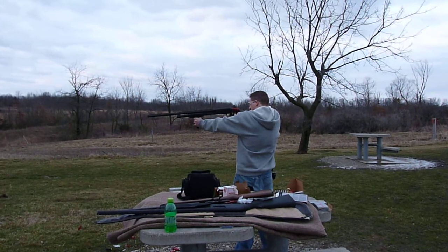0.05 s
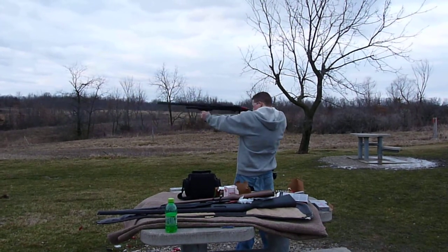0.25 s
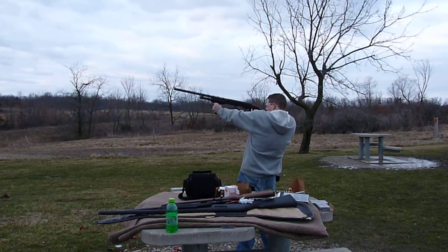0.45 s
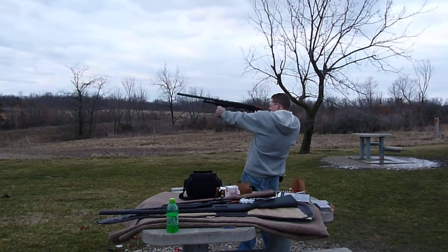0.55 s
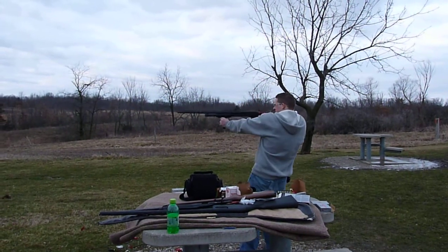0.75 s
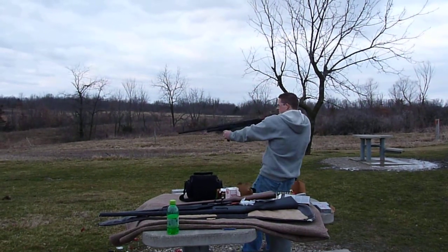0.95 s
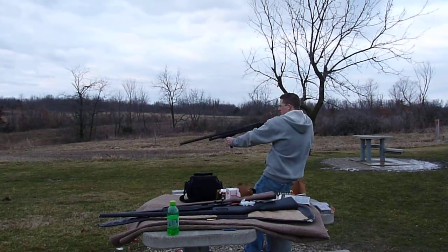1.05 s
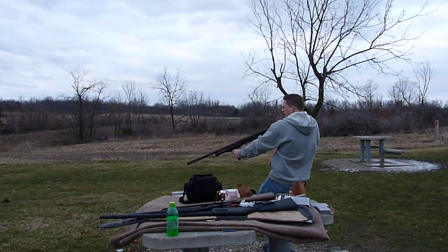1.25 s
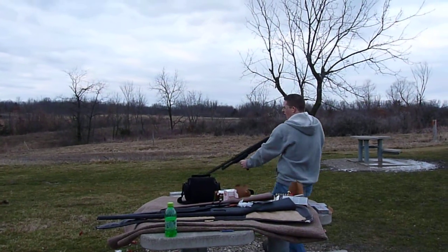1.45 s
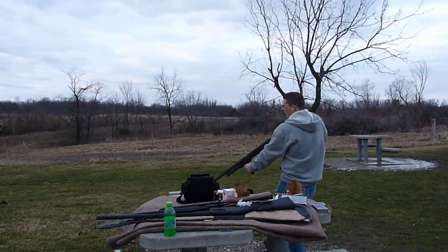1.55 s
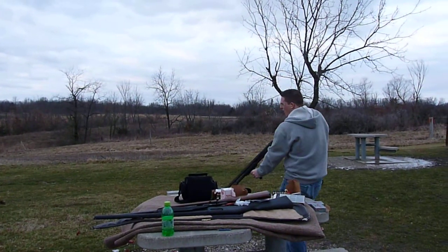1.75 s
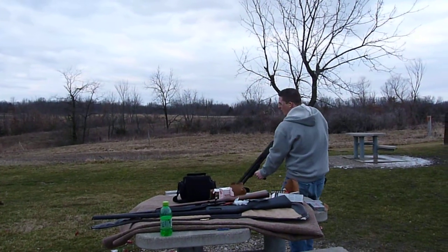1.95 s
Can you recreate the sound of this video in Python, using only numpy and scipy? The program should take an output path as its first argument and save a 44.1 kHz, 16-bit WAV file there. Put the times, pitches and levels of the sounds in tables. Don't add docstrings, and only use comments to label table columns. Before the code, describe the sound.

One loud, overloaded shotgun shot, then crackling, thumping echoes fading over quiet open ground

```python
import sys
import numpy as np
from scipy import signal
from scipy.fft import rfft, irfft
from scipy.io import wavfile
from scipy.ndimage import uniform_filter1d

SR = 44100
rng = np.random.default_rng(int(sys.argv[2]) if len(sys.argv) > 2 else 0)


def digitize_waveform(pressure):
    field = np.atleast_2d(pressure).T
    bounded = np.clip(field, -1, 1)
    quanta = np.round(bounded * 32767).astype(np.int16)
    wavfile.write(sys.argv[1], SR, quanta)


def ratio(d):
    e = np.asarray(d, float) / 20
    return 10 ** e


N = 88200
T = np.arange(N) / SR
SHOT_S = .2172

# start_s, level_db
OVERLOAD_KICKS = [(.2185, -15), (.2204, -18), (.2239, -16), (.2248, -19), (.2256, -17), (.2280, -15),
                  (.2305, -19), (.2316, -21), (.2322, -22), (.2331, -21), (.2355, -19), (.2378, -22),
                  (.2393, -24)]
# time_s, level_db
ROAR_LEVEL = [(.23, -21), (0.263, -24.5), (0.309, -30.5), (.5, -27.5), (0.771, -27.5), (1.099, -28.5),
              (1.2, -32.5), (1.6, -38), (2.0, -45)]
# pitch_hz, level_db
ROAR_TONE = [(70, -20), (230, 0.5), (345, -4), (560, -18), (800, -10), (1370, -13), (2770, -25.5),
             (5000, -62.5)]
# centre_s, depth_db, length_s
LULLS = [(0.406, -2.5, 0.014), (0.593, -3.5, 0.0093), (1.194, -3, 0.0097), (1.235, -1.5, 0.0091),
         (0.243, 0, 0.0077), (0.86, -1, .008), (0.377, -3, 0.0061), (.414, -5.5, 0.0037),
         (.474, -3.5, 0.0049), (0.513, -5, 0.0092), (0.645, -3.5, 0.0057), (.72, -0.5, .01),
         (0.788, -1.5, .006), (1.147, -2.5, .005), (1.596, -2.5, 0.006), (1.895, -3, 0.011)]
# centre_s, level_db, length_s, pitch_hz
THUMPS = [(0.261, -21, 0.0067, 224), (0.28, -18.5, 0.0045, 324), (0.321, -18.5, 0.0065, 267),
          (0.355, -22.5, 0.012, 267), (0.391, -13.5, 0.0067, 290), (0.455, -11.5, 0.0078, 195),
          (0.492, -10.5, 0.0058, 214), (0.523, -19, 0.0083, 253), (0.542, -23.5, 0.014, 290),
          (0.613, -26, 0.0083, 242), (0.648, -8.5, 0.005, 325), (0.688, -20, 0.017, 243),
          (0.736, -34.5, 0.0077, 262), (0.754, -16.5, 0.0078, 280), (0.78, -18, 0.014, 216),
          (0.898, -20, 0.013, 212), (0.909, -16, 0.0048, 262), (0.934, -22, 0.0046, 286),
          (1.092, -21.5, 0.011, 268), (1.113, -24, 0.0056, 252), (1.181, -23, 0.01, 231),
          (1.307, -19.5, 0.018, 189), (1.359, -26.5, 0.0084, 213), (1.396, -26, 0.0052, 226),
          (1.459, -29.5, 0.038, 208), (1.564, -27, 0.013, 212), (1.61, -24.5, 0.01, 244),
          (1.622, -26.5, 0.01, 235), (1.755, -35.5, 0.016, 290), (1.771, -38, 0.0092, 262),
          (1.874, -35.5, 0.01, 262), (0.346, -25, 0.014, 580), (0.385, -26, 0.007, 480),
          (0.426, -22.5, 0.0061, 495), (0.445, -28, 0.007, 560), (0.486, -24.5, 0.008, 440),
          (0.686, -32, 0.0058, 538), (0.731, -41, 0.0057, 545), (0.910, -37, 0.011, 510),
          (0.856, -26, 0.018, 207), (0.88, -25, 0.01, 199), (0.939, -19, 0.0084, 300),
          (1.26, -28, 0.015, 289), (1.345, -23, 0.011, 220), (1.653, -33.5, 0.029, 220)]
# centre_s, level_db, length_s, pitch_hz
RATTLES = [(0.349, -26.5, 0.015, 930), (0.388, -21.5, 0.0063, 1233), (0.425, -25, 0.0024, 970),
           (0.442, -21, 0.0077, 940), (0.45, -19, 0.0034, 880), (0.46, -26, 0.0036, 990),
           (0.491, -22.5, 0.0062, 1550), (0.54, -25, 0.015, 1310), (0.573, -19.5, 0.009, 850),
           (0.608, -22.5, 0.006, 1170), (0.629, -23.5, 0.004, 1140), (0.638, -22, 0.003, 1110),
           (0.26, -19, 0.0096, 1000), (0.694, -29.5, 0.004, 1100), (0.781, -29, 0.005, 1100),
           (1.129, -25, 0.0023, 1300), (0.673, -29, 0.033, 1200), (0.705, -23, 0.0038, 1270),
           (0.766, -28.5, 0.068, 1270), (0.807, -29.5, 0.0041, 1270), (0.829, -24, 0.0025, 1180),
           (0.849, -26.5, 0.0082, 1305), (0.896, -25.5, 0.0069, 1030), (0.909, -27.5, 0.011, 915),
           (0.926, -33, 0.0096, 1085), (0.951, -27, 0.0044, 990), (1.023, -24, 0.0063, 1240),
           (1.05, -26, 0.012, 1120), (1.112, -33.5, 0.011, 1140), (1.137, -24, 0.0038, 1070),
           (1.185, -28.5, 0.0052, 1020), (1.156, -31.5, 0.002, 1200), (1.214, -36, 0.026, 1100),
           (1.33, -40.5, 0.0092, 990), (1.351, -36, 0.056, 970), (1.512, -42, 0.0077, 880),
           (1.523, -37.5, 0.011, 980), (1.621, -36, 0.0065, 1010), (1.861, -48, 0.0074, 1240)]
# pitch_hz, level_db
RATTLE_TONE = [(550, -17), (750, 5.5), (1800, -6), (2800, -15), (4000, -42.5)]
# pitch_hz, level_db
FIZZ_TONE = [(2000, 4.5), (3000, 1.5), (5000, -19.5), (7000, -32)]
# centre_s, level_db, length_s
CRACKLES = [(0.226, -19.5, .0012), (.2282, -19, .0007), (0.231, -20, .002), (0.244, -26, .0015),
            (0.251, -29, 0.0042), (.262, -33, 0.035), (.273, -28, .005), (0.349, -21, 0.0043),
            (0.39, -36, .004), (0.449, -24, 0.0034), (0.49, -24, .006), (0.532, -26, .004),
            (0.538, -33.5, 0.0041), (0.681, -25, .012), (0.734, -20.5, 0.0047), (0.76, -23, 0.013),
            (0.825, -22, .003), (0.886, -26, 0.0059), (1.022, -24, 0.0044), (1.05, -31, .008),
            (1.082, -28, 0.0031), (1.100, -34.5, .003), (1.129, -36, .004), (1.188, -39, 0.0027)]
# start_s, level_db, pitch_hz, ring_s
CLICKS = [
    (1.376, -56, 4000, .002),
    (1.474, -49, 2900, .004),
    (1.4745, -53, 3450, .004),
    (1.516, -43, 3350, .0012),
    (1.5162, -44, 2800, .0014),
    (1.858, -41, 1120, .012),
    (1.835, -44, 960, .014),
    (1.945, -38, 560, .012),
    (1.947, -41, 720, .012),
]
# start_s, end_s, from_hz, to_hz
WHINE = (1.665, 1.785, 1320, 1215)
# pitch_hz, level_db
FIELD_TONE = [(44, -37), (75, -11.5), (112, -3.5), (125, -1.5), (340, -18.5), (621, -17.5), (808, -22),
              (3000, -41), (3900, -70), (6600, -120)]
# pitch_hz, level_db
HISS_TONE = [(1500, -7.5), (3000, 0), (4700, -0.5), (6900, -0.5), (8100, -6), (8650, -21.5), (9200, -63)]


def level(x, db):
    return x * ratio(db) / np.sqrt(np.mean(x ** 2))


def colour(x, points, flat_low=False):
    hz = np.fft.rfftfreq(N, 1 / SR) + 1e-3
    points = np.array(points, float)
    octaves, point_octaves = np.log2(hz), np.log2(points[:, 0])
    db = np.interp(octaves, point_octaves, points[:, 1])
    db = db - 12 * np.clip(octaves - point_octaves[-1], 0, 9)
    if not flat_low:
        db = db - 24 * np.clip(point_octaves[0] - octaves, 0, 9)
    return irfft(rfft(x) * ratio(db) * (hz > 30), N)


def walk(rate_hz):
    hold = int(SR / rate_hz)
    steps = np.repeat(rng.standard_normal(N), hold)[:N]
    return 1.63 * uniform_filter1d(uniform_filter1d(steps, hold), hold)


def hump(start_s, rise_s, fall_s):
    since = np.clip(T - start_s, 0, None)
    return (1 - np.exp(-since / rise_s)) ** 2 * np.exp(-since / fall_s)


def bell(centre_s, length_s):
    return np.exp(-((T - centre_s) / length_s) ** 2)


def blast():
    since = T - SHOT_S
    swell = np.exp(np.where(since < 0, since / 0.00075, -since / 0.00022))
    bent_time = since * (1 + 150 * np.clip(since, -.003, 0))
    crack = ratio(-15.5) * swell * np.cos(2 * np.pi * 2610 * bent_time)
    body = ratio(-18) * bell(SHOT_S, 0.00058) * np.cos(2 * np.pi * 1300 * since + 2.0)
    snap = -ratio(-19) * bell(SHOT_S, 0.00008) * np.sin(2 * np.pi * 5600 * since)

    kicks = sum(-2 * ratio(db) * hump(start_s, .00011, .0006) for start_s, db in OVERLOAD_KICKS)
    soft = np.exp(-(np.arange(-40, 41) / SR / 0.00007) ** 2)
    kicks = np.convolve(kicks, soft / soft.sum(), "same")

    sag = -ratio(-42) * hump(SHOT_S, .003, .015)
    rebound = ratio(-41) * hump(SHOT_S, .03, .08)
    return crack + body + snap + kicks + sag + rebound


def echo_crowd():
    returns_per_s, scatter_db = 3500, 2
    chance, sign, size = rng.random((3, N))
    returns = (chance < returns_per_s / SR) * np.sign(sign - .5)
    returns = returns * ratio(-scatter_db * np.log(size + 0.0035))
    clumps = ratio(1.2 * walk(110))
    return level(colour(returns * clumps, ROAR_TONE), 0)


def roar():
    spectrum = rfft(echo_crowd())
    octaves = np.log2(np.fft.rfftfreq(N, 1 / SR) + 1e-3)
    late = np.clip(T - SHOT_S, 0, None)
    out = 0
    for octave in np.arange(5, 13.6, .5):
        band = irfft(spectrum * np.clip(1 - 2 * abs(octaves - octave), 0, 1), N)
        khz = 2 ** octave / 1000
        db = -1 * min(khz, 4.5) ** 1.89 * (late - .55)
        db += 1 * min(khz / 3, 1.5) * np.exp(-late / 0.15)
        db += 14.5 * np.exp(-late / 0.23 - (np.log2(khz * 1000 / 520) / .4) ** 2)
        db += -16 * np.exp(-late / 0.039) * np.clip((0.79 - khz) / .3, 0, 1)
        power = band ** 2
        smooth_power = uniform_filter1d(power, size=int(0.036 * SR)) + .1 * power.mean()
        band = band * (power.mean() / smooth_power) ** (.33 if khz < .45 else .27)
        out = out + band * ratio(db + .8 * walk(25))

    hollow = signal.lfilter(*signal.iirpeak(440, 2.65, SR), out)
    out = out - 0.71 * (1 - np.exp(-(late / 0.63) ** 2)) * hollow
    out = out * ratio(sum(db * bell(centre_s, length_s) for centre_s, db, length_s in LULLS))
    points = np.array(ROAR_LEVEL)
    loudness = ratio(np.interp(T, points[:, 0], points[:, 1]) + 1.0)
    return out * loudness * (1 - np.exp(-(late / .019) ** 2))


def thumps():
    out, phases = np.zeros(N), 2 * np.pi * rng.random(len(THUMPS))
    for (centre_s, db, length_s, hz), phase in zip(THUMPS, phases):
        tone = np.cos(2 * np.pi * hz * (T - centre_s) + phase)
        out += ratio(db - 1.5) * bell(centre_s, .5 * length_s) * tone
    return out


def rattles(fizz):
    mids = level(colour(rng.standard_normal(N), RATTLE_TONE), 0)
    mids = mids / np.sqrt(uniform_filter1d(mids ** 2, size=200) + 0.16)
    out = np.zeros(N)
    for centre_s, db, length_s, hz in RATTLES:
        u = (T - centre_s) / (0.64 * length_s)
        burst = ratio(db - 6) * np.exp(-np.where(u < 0, 1.4 * u, u) ** 2)
        noise = burst * mids
        ring = signal.lfilter(*signal.iirpeak(hz, 1.53, SR), noise)
        out += burst * fizz * ratio(-8.5) + noise + 0.97 * ring
    return out


def crackles(fizz):
    return sum(ratio(db) * bell(centre_s, length_s) * fizz for centre_s, db, length_s in CRACKLES)


def echoes():
    fizz = level(colour(rng.standard_normal(N), FIZZ_TONE), -19) * ratio(-9 * (T - SHOT_S))
    mixed = thumps() + rattles(fizz) + crackles(fizz)
    return signal.sosfilt(signal.butter(2, 147, "high", fs=SR, output="sos"), mixed)


def overloaded(back):
    limit = 0.31
    back = limit * np.tanh(back / limit)
    bend = signal.sosfilt(signal.butter(2, [12, 90], "band", fs=SR, output="sos"), back ** 2)
    return back - 0.52 * bend


def metal_clicks():
    return sum(ratio(db) * hump(start_s, .0002, ring_s) * np.sin(2 * np.pi * hz * (T - start_s))
               for start_s, db, hz, ring_s in CLICKS)


def whine():
    start_s, end_s, from_hz, to_hz = WHINE
    progress = np.clip((T - start_s) / (end_s - start_s), 0, 1)
    hz = (from_hz + (to_hz - from_hz) * progress) * (1 + .003 * walk(80))
    tone = np.sin(2 * np.pi * np.cumsum(hz) / SR)
    return ratio(-47 + 1.6 * walk(38.3)) * np.sin(np.pi * progress) ** 0.14 * tone


def field():
    return level(colour(rng.standard_normal(N) * ratio(0.4 * walk(45)), FIELD_TONE), -53.5)


def circuit_hiss():
    return level(colour(rng.standard_normal(N), HISS_TONE, flat_low=True), -69)


def scene():
    back = overloaded(roar() + echoes())
    return (blast() + back + metal_clicks() + whine() + field())[None]


def band_limit(x):
    return signal.sosfilt(signal.butter(12, 8780, fs=SR, output="sos"), x)


def record(dry):
    top_cut = signal.cheby2(5, 30, 9450, fs=SR, output="sos")
    offset = -.0079
    return band_limit(signal.sosfiltfilt(top_cut, dry) + circuit_hiss() + offset)


dry = scene()
out = record(dry)
digitize_waveform(out)
```